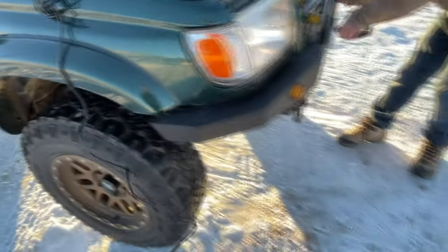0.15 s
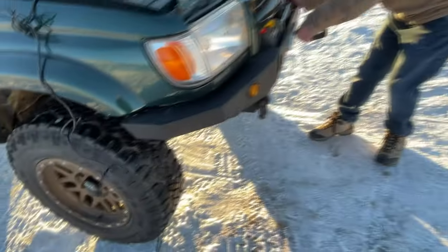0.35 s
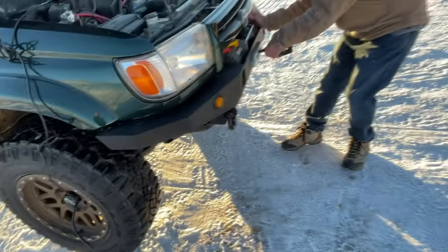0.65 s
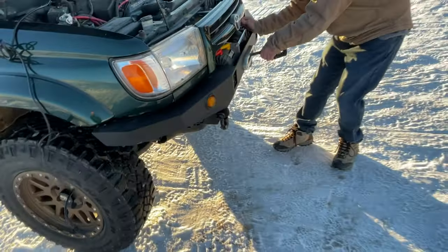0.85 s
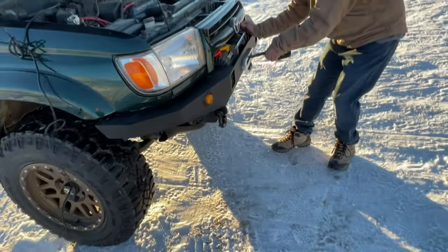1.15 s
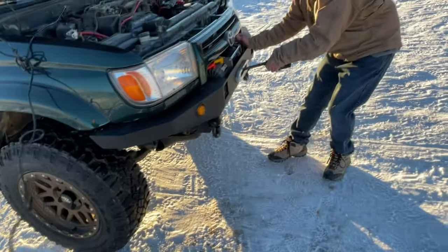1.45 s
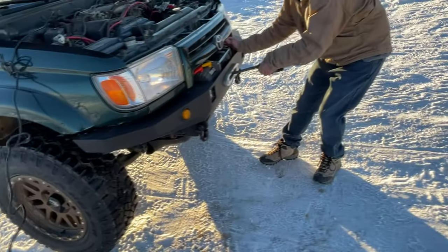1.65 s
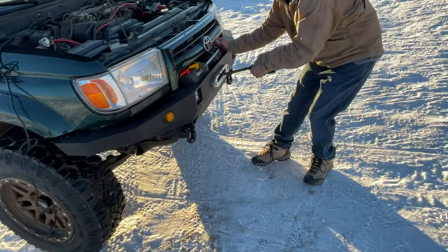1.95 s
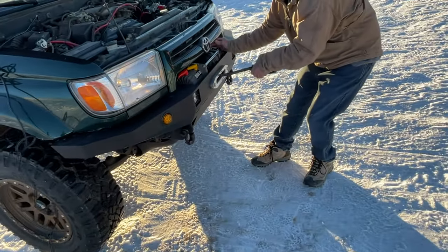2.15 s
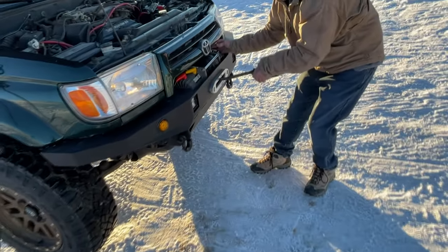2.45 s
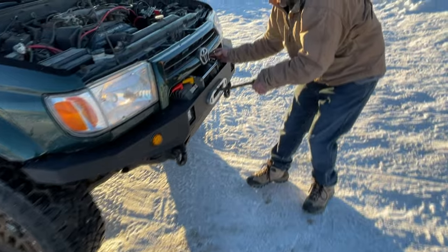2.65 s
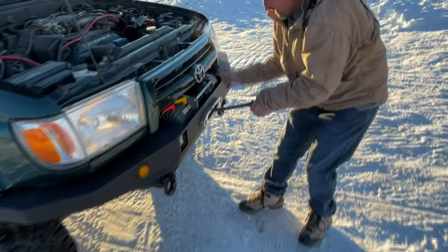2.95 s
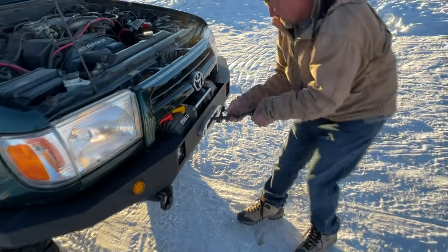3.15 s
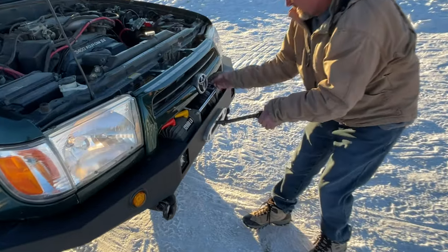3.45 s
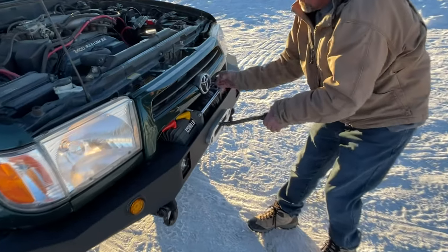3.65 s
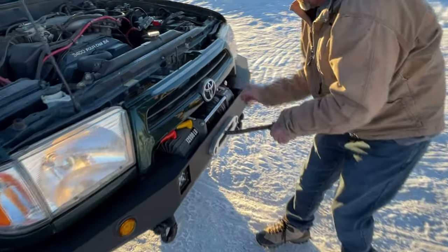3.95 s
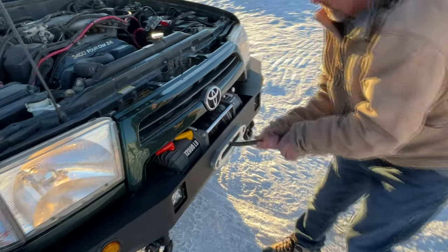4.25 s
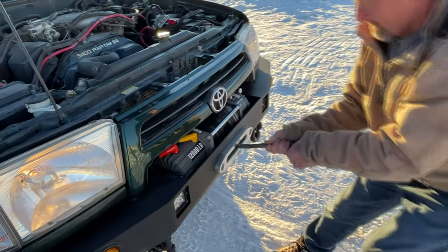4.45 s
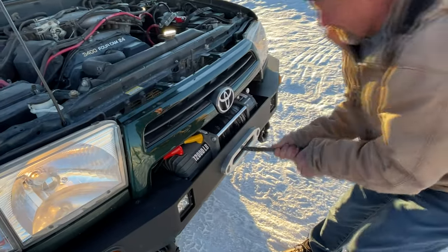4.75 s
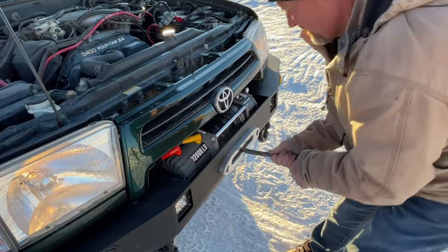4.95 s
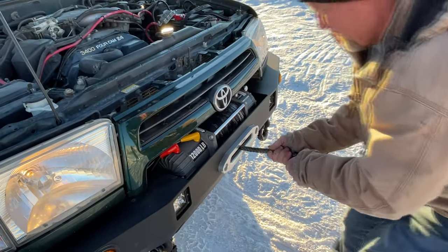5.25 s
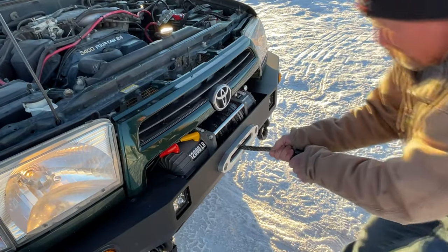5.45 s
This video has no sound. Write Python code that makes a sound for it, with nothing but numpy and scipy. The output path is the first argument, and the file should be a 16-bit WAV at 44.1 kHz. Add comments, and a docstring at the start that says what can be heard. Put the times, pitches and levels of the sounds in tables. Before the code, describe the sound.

Outdoors on snow beside an open engine bay, heard closely on a handheld phone in stereo. A plastic remote key snaps, a winch clunks hard and spins up with a rough, whining rattle, then is switched off and coasts down. The petrol engine idles underneath, and a few cable clinks, ticks, a metal clunk and short scrapes follow.

```python
"""Outdoors in snow, at the steel front bumper of a vehicle with its bonnet open.
A remote key snaps; an electric winch clunks, spins up, is switched off and coasts to rest: brushes
whine at multiples of the shaft rate, and rough gear knocks drive resonances of housing and bumper.
The petrol engine, crank orders plus shaped noise, idles and sags under the load; grit bursts make
hook and cable clink, scrape and tick. All is heard through the two ports of a handheld phone."""
import sys
import numpy as np
from scipy import signal
from scipy.fft import rfft, irfft
from scipy.io import wavfile
from scipy.ndimage import uniform_filter1d

SR = 44100
rng = np.random.default_rng(int(sys.argv[2]) if len(sys.argv) > 2 else 0)


def master(y):
    """Save y as 16-bit WAV."""
    cut = np.clip(np.atleast_2d(y).T, -1, 1)
    pcm = np.round(cut * 32767)  # scale
    wavfile.write(sys.argv[1], SR, pcm.astype(np.int16))


N = 246519
T = np.arange(N) / SR
F = np.maximum(np.arange(N // 2 + 1) * SR / N, 1.)

# resonances of the winch housing: f/Hz, width/Hz, level/dB
BOOM_MODES = [(295.5, 12.9, 0.5), (339.4, 21.7, 1), (367.4, 19.2, 1), (416, 21.6, -1), (450, 24.6, -4),
              (500.5, 17.6, -5), (612, 36, -9.5)]
# resonances of the steel bumper: f/Hz, width/Hz, level/dB
STEEL_MODES = [(608, 45, -8), (828, 55, -1), (1015, 50, -3), (1215, 40, -3), (1361, 26, -6), (1560, 45, -2),
               (1745, 70, -1), (2325, 60, -15), (3760, 200, -20), (4880, 70, -10), (6460, 400, -10),
               (7700, 150, -16)]
# winch: switched on, gear teeth engage, switched off, brake holds
ON_S, SLACK_S, OFF_S, STOP_S = 0.227, 0.2693, 1.62, 2.5
FREE_TURNS_S = 92.5  # motor shaft at free speed, turns/s


def shaft():
    """Speed as a share of free speed: a run-up in a quick and a slow stage, then an even run-down."""
    quick_share, quick_s, slow_s = .45, .024, .25
    coast_turns_s2 = 79.5
    on = np.clip(T - ON_S, 0, None)
    off = np.clip(T - OFF_S, 0, None)
    up = 1 - quick_share * np.exp(-on / quick_s) - (1 - quick_share) * np.exp(-on / slow_s)
    return np.clip(up - coast_turns_s2 / FREE_TURNS_S * off, .01, 1)


def rotor():
    """Angle of the motor shaft, which never runs quite evenly."""
    turns_s = FREE_TURNS_S * shaft() * (1 + .0013 * walk(40))
    return 2 * np.pi * np.cumsum(turns_s) / SR


def motor(turn):
    """Brushes cross the commutator bars; an uneven rotor throbs the whine and shakes the mount once a turn."""
    # whine: multiple of bar rate, level/dB, depth of the throb
    whine_orders = [(1, -2, .6), (2, -1.5, .55), (3, -13, .9)]
    bars = 29
    speed, off = shaft(), np.clip(T - OFF_S, 0, None)
    # share of stall current, capped; the tones grow with it
    current = np.minimum(1 - speed, .17) * (T < OFF_S)
    whine_db = -50 + 55 * current
    overtone_db = -46.5 + 22 * current
    # the motor case lifts the whine as it sweeps through
    case_hz, case_width_hz, case_db = 1950, 300, 5
    offset = (bars * FREE_TURNS_S * speed - case_hz) / case_width_hz
    whine_db = whine_db + case_db * np.exp(-.5 * offset ** 2)

    throb = np.cos(turn) + np.cos(2 * turn + 1.4) + .37 * np.cos(3 * turn + 3.8) + .5 * np.cos(4 * turn + .42)
    first, *overtones = (
        undb(db + 3 * walk(60)) * (1 + depth * throb) * np.sin(k * bars * turn)
        for k, db, depth in whine_orders)
    whine = undb(whine_db) * first + undb(overtone_db) * sum(overtones)
    # fades in as the teeth engage, and away once the current is cut
    engaged = np.clip((T - SLACK_S) / .05, 0, 1) * undb(-130 * off)

    # under power the hum follows speed; after switch-off it only fades
    hum_growth = speed ** (5.5 * (T < OFF_S))
    hum = hum_growth * undb(-36 - 91.5 * off + 1.9 * walk(11.04)) * np.sin(turn)
    return engaged * whine + np.sqrt(2) * hum


def gears(turn):
    """Loose teeth knock unevenly; the housing booms, the steel bumper rings and the brushes hiss."""
    # colour of the rattle: f/Hz, level/dB per Hz
    rattle_colour = [(450, -43), (620, -9), (800, 4), (1300, 5.5), (1800, -2), (2500, -14), (3300, -43),
                     (6000, -43)]
    # colour of the brush hiss: f/Hz, level/dB per Hz
    brush_colour = [(1800, 4), (2800, 3.5), (3800, 0.5), (5000, -1), (5700, -19), (6500, -18), (8300, 4),
                    (10000, -3), (13800, -29), (15500, -78)]
    speed = shaft()
    running = np.clip((T - SLACK_S) / .0049, 0, 1) * np.clip((STOP_S - T) / .077 + 1, 0, 1)
    # a burst as the teeth take up their slack
    slack_db = 27 * np.exp(-np.clip(T - SLACK_S, 0, None) / .015)
    tooth_knocks = grit(2.3) * undb(1.7 * walk(80))
    mesh = grit(2.2) * undb(2 * walk(100) + walk(13.97))

    wobble = unit(sum(np.cos(k * turn) for k in range(3, 8)))
    boom_drive = (tooth_knocks + .08 * wobble) * undb(walk(45) + slack_db * (T > SLACK_S))
    # the housing booms most on the way up
    surge_db = 7.5 * bell(.51, .0973)
    boom = ring(boom_drive, BOOM_MODES) * speed ** 1.36 * undb(-27.5 + surge_db)

    # one high tooth strikes once a turn, so the bumper sings where a shaft multiple meets a mode
    tooth = unit(sum(np.cos(k * turn) for k in range(6, 28)))
    bumper = flutter(grit(1.5) + .3 * tooth, STEEL_MODES[:8], 3.5, 14)
    rattle = unit(colour(mesh, rattle_colour) + bumper)
    # above 2250 Hz the rattle dies faster as the gears slow
    dull = signal.sosfiltfilt(signal.butter(4, 2250, fs=SR, output="sos"), rattle)
    bright = (rattle - dull) * speed ** (2.4 * (T > OFF_S))
    rattle = (dull + bright) * speed ** 1.53 * undb(-28.5 + slack_db)

    hiss = unit(colour(mesh, brush_colour) + undb(-5) * ring(grit(1.35), STEEL_MODES[8:]))
    brushes = undb(-32) * speed ** np.where(T < OFF_S, 1, 3.77)
    brake = undb(-46.5) * bell(2.396, .073)  # rubs before the stop
    return running * (boom + rattle + hiss * (brushes + brake))


def jolt():
    """The start jolt leaves the lowest housing mode ringing after the teeth engage."""
    after = np.clip(T - .274, 0, None)
    t60_s = .55
    return undb(-20.5 - 60 * after / t60_s) * np.sin(2 * np.pi * BOOM_MODES[0][0] * after)


def drones():
    """Single modes that stand out for a while: one of the bumper, one of the housing."""
    def tone(hz, db):
        wavering_hz = hz * (1 + .0045 * walk(20))
        level = np.sqrt(2) * undb(db + 3.1 * walk(25.3))
        return level * np.sin(2 * np.pi * np.cumsum(wavering_hz) / SR)

    # the bumper sings while the shaft nears full speed
    sing = (T > SLACK_S) * bell(.78, .24) * tone(STEEL_MODES[4][0], -36.5)
    # the last slow turns drone in the lowest housing mode
    stopping = np.clip((STOP_S - T) / .05 + 1, 0, 1)
    drag = stopping * bell(2.33, .18) * tone(BOOM_MODES[0][0], -39.5)
    return sing + drag


def knocks():
    """All contacts of relay, gears, hook, cable and housing: grit bursts that ring housing, hardware or both."""
    # resonances of the hook: f/Hz, width/Hz, level/dB
    hook_modes = [(990, 95, 9), (1470, 31, 16), (1600, 89, 6), (1836, 29, 9), (2220, 70, 0),
                  (3130, 100, -5), (4020, 77, -3), (4190, 110, 0), (4740, 140, -9), (5600, 350, 2),
                  (6270, 300, -1), (7500, 100, 4)]
    # contact kinds: rise/ms, spread/octaves, housing boom/dB, steel ring/dB (None = not rung), opening tick size
    clunk_kind = (3.5, 1.44, -5, -3.5, 8)
    scrape_kind = (5, 1.3, -18.5, -0.5, 0)
    thud_kind = (2, 0.66, -11, None, 3)
    clink_kind = (0.96, 0.84, None, -14, 3)
    tick_kind = (0.03, 0.33, None, -6, 7)
    # relay, gear and hook blows that reach the housing: t/s, level/dB, centre f/Hz, hold/ms, t60/ms
    clunk_rows = [(0.225, -29, 2890, 38, 40), (0.238, -22, 1500, 13, 34), (0.25, -16, 1580, 5.6, 110),
                  (3.815, -23, 1040, 6, 124)]
    # slow contacts of hook and cable: t/s, level/dB, centre f/Hz, hold/ms, t60/ms
    scrape_rows = [(5.294, -21.5, 2800, 7.6, 45), (5.308, -21.5, 2300, 7, 57), (5.334, -37, 3000, 21, 200),
                   (5.367, -36, 1090, 26, 110)]
    # dull low thuds that boom in the winch housing: t/s, level/dB, centre f/Hz, hold/ms, t60/ms
    thud_rows = [(2.408, -36.5, 700, 4, 45), (3.744, -37, 533, 13, 75), (3.823, -27, 440, 9, 220),
                 (3.873, -31, 259, 5.5, 39)]
    # bright cable clinks: t/s, level/dB, centre f/Hz, hold/ms
    clink_rows = [(0.862, -26, 4950, 5.6), (1.596, -28, 3600, 12), (2.355, -49, 4300, 22),
                  (2.433, -39, 4260, 10), (2.588, -43.5, 4400, 12), (3.051, -36, 3860, 1.5),
                  (3.788, -39, 2720, 18)]
    # small dry ticks: t/s, level/dB, centre f/Hz
    tick_rows = [(2.876, -39, 1280), (2.911, -41, 900), (2.981, -41, 900), (3.054, -28.5, 1770),
                 (3.923, -39, 900), (4.311, -26.5, 1350)]
    bodies = poles(BOOM_MODES[3:]), poles(hook_modes)
    clunks = sum(contact(bodies, clunk_kind, *row) for row in clunk_rows)
    scrapes = sum(contact(bodies, scrape_kind, *row) for row in scrape_rows)
    thuds = sum(contact(bodies, thud_kind, *row) for row in thud_rows)
    clinks = sum(contact(bodies, clink_kind, *row, t60_ms=45) for row in clink_rows)
    ticks = sum(contact(bodies, tick_kind, *row, hold_ms=1.3, t60_ms=41) for row in tick_rows)
    return clunks + scrapes + thuds + clinks + ticks


def contact(bodies, kind, s, db, hz, hold_ms, t60_ms):
    """A burst of grit in a broad band; part of the blow rings the housing, the steel hardware or both."""
    rise_ms, spread, boom_db, steel_db, tick = kind
    ms = (T - s) * 1000
    decay_ms = np.clip(ms - rise_ms - hold_ms, 0, None)
    shape = np.clip(ms / rise_ms, 0, 1) * undb(-60 * decay_ms / t60_ms)
    blow = grit(2.6)
    blow[int((s + rise_ms / 1000) * SR)] = tick
    band = through(blow, np.exp(-.5 * (np.log2(F / hz) / spread) ** 2)) * shape
    size = np.sqrt(np.mean(band ** 2))
    boom = 0 if boom_db is None else undb(boom_db) * through(blow * shape, bodies[0])
    steel = 0 if steel_db is None else undb(steel_db) * through(band, bodies[1])
    return undb(db) * (band + size * (boom + steel))


def button():
    """The remote's plastic key snaps close to the phone and its shell pings."""
    # shell pings: f/Hz, level/dB
    shell_pings = [(3500, -5), (6460, -14), (8000, -14), (10500, -16.5)]
    ping = sum(undb(db) * np.sin(2 * np.pi * (hz * T + rng.random())) for hz, db in shell_pings)
    snap = undb(-8.5) * ring(grit(.81), [(6000, 10000, 0)])
    return undb(-12.5) * (ping + snap) * bell(.2022, .0014)


def engine():
    """Uneven cylinders sound many crank orders, strongest at 4, 7 and 13; roar pulses, valves tick twice a turn."""
    # engine levels over time: the low throb enters at half a second, roar and hiss vary:
    # t/s, exhaust throb level/dB, block roar level/dB, fan hiss level/dB
    bay_levels = [(0, -80, -40.5, -50), (0.42, -70, -35, -56), (0.55, -46.5, -31.5, -49.5),
                  (1.6, -39.5, -42.5, -54), (2.2, -41.5, -39, -54.5), (3.1, -44.5, -36.5, -51.5),
                  (3.9, -43, -35.5, -51.5), (4.7, -46.5, -34.5, -48.5), (5.15, -48, -34.5, -50.5),
                  (5.2, -48.5, -36.5, -53), (5.59, -50, -38, -54)]
    # exhaust throb: multiple of crank rate, level/dB
    crank_orders = [(3, -17), (4, 0), (5, -5), (6, -5), (7, 0), (8, -10), (10, -14), (11, -12), (12, -10),
                    (13, -4), (14, -10), (16, -10)]
    # colour of the block roar: f/Hz, level/dB per Hz
    roar_colour = [(22, -36), (35, -22.5), (54, -13), (120, -2.5), (155, -11), (250, -5), (380, -11.5),
                   (600, -12.5), (1000, -11.5), (1350, -12), (1800, -19), (2800, -24.5), (5200, -31),
                   (9000, -40.5), (12000, -88)]
    # colour of the fan hiss: f/Hz, level/dB per Hz
    fan_colour = [(3000, -2), (5000, -7), (8000, -1.5), (9500, -3.5), (11000, -2), (12500, -3.5),
                  (14000, -6.5), (15500, -12)]
    throb_db, roar_db, fan_db = curves(bay_levels)

    # the winch's draw on the alternator pulls the idle down, with a lag
    idle_turns_s, sag_turns_s, lag_s = 17.75, 1.6, .3
    lag = int(lag_s * SR)
    powered = 1. * (T > ON_S) * (T < OFF_S)
    load = uniform_filter1d(powered, lag, origin=(lag - 1) // 2)  # mean of the past only
    crank = idle_turns_s - sag_turns_s * load
    turn = 2 * np.pi * np.cumsum(crank * (1 + .01204 * walk(5))) / SR

    throb = sum(
        undb(db + 1.35 * walk(9)) * np.sin(k * turn + 2 * np.pi * rng.random())
        for k, db in crank_orders)
    # the roar pulses with the firings, three a turn
    roar = colour(grit(1.96) * undb(1.5 * np.cos(3 * turn) + 1.42 * walk(12)), roar_colour)
    valve_ticks = 1 + .85 * np.exp(-(turn / np.pi % 1) / .23)
    fan = colour(grit(1.66) * valve_ticks, fan_colour)

    # the treble hiss swells once, then roar and hiss dip briefly
    swell_s = 4.93
    fan_db = fan_db + 7.5 * bell(swell_s, np.where(T < swell_s, .065, .015))
    dip = undb(-27.5 * bell(5.167, .00515))
    bay = (undb(roar_db) * roar + undb(fan_db) * fan) * dip
    return np.sqrt(2) * undb(throb_db) * throb + bay


def covers():
    """Engine covers ring faintly at their own pitches."""
    # cover resonances: f/Hz, width/Hz, level/dB
    cover_modes = [(232, 9, 7), (385, 14, -1), (570, 14, 1), (893, 12, 1), (1190, 7, 2), (1463, 14, -6),
                   (1604, 9, -1), (5200, 120, -22)]
    # the ringing rises, then eases a little near the end: t/s, level/dB
    cover_levels = [(0, -64), (2.6, -55), (3.6, -53), (4.5, -47), (5.15, -47), (5.2, -50), (5.59, -50)]
    return undb(curves(cover_levels)[0]) * flutter(grit(1.4), cover_modes, .77, 3.95)


def ports(x, scatter_ms):
    """The right port hears the sound late; both hear scattered bounces off snow and bodywork, in opposite sense."""
    # phase by which the left port leads: f/Hz, lead/rad
    port_lead = [(0, 0), (400, .45), (650, 1.2), (1380, 2.2), (1810, 4.8), (2500, 9), (2840, 9.6),
                 (4220, 14), (5940, 10.4), (6900, 12), (7500, 9.9), (8200, 9.9), (9000, 9.42), (10300, 8.6),
                 (11700, 7.45), (13000, 6.35), (13700, 6.28), (16500, 6.28)]
    # left minus right: f/Hz, level/dB
    port_tilt = [(60, 1), (380, .5), (650, 6), (1250, .5), (2400, 3), (5000, 6.5), (7500, 4), (8600, 0),
                 (15000, 0)]
    # likeness of the two ports: f/Hz, likeness/0-1
    port_likeness = [(60, .94), (150, .9), (350, .95), (700, .7), (1200, .55), (2000, .3), (5000, .25),
                     (7500, .55), (9000, .85), (11500, .72), (13200, .97)]
    bounce = rfft(rng.standard_normal(N) * np.exp(-T * 1000 / scatter_ms))
    bounce = bounce / np.sqrt(np.mean(np.abs(bounce) ** 2))
    alike = np.clip(across(port_likeness), 0, 1)
    direct = np.sqrt((1 + alike) / 2)
    stray = np.sqrt((1 - alike) / 2) * bounce
    tilt = undb(across(port_tilt) / 2)
    late = np.exp(-1j * np.interp(F, *np.transpose(port_lead)))
    left = (direct + stray) * tilt
    right = (direct - stray) * late / tilt
    return irfft(rfft(x) * np.array([left, right]), N)


def undb(db):
    """Amplitude factor of a level in dB."""
    return 10 ** (np.asarray(db) / 20)


def unit(x):
    """Scaled to an rms of one."""
    return x / np.sqrt(np.mean(x ** 2))


def bell(s, width_s):
    """A Gaussian swell in time, one at its peak."""
    return np.exp(-.5 * ((T - s) / width_s) ** 2)


def curves(rows):
    """Columns of a time table, one value per sample."""
    s, *columns = np.transpose(rows)
    return [np.interp(T, s, c) for c in columns]


def across(points):
    """A table of frequency and value read at every frequency, along log frequency."""
    hz, value = np.transpose(points)
    return np.interp(np.log(F), np.log(np.maximum(hz, 1.)), value)


def walk(rate):
    """Random levels held 1 / rate s and slewed twice."""
    k = int(SR / rate)
    held = np.repeat(rng.standard_normal(N // k + 1), k)
    return 1.426 * uniform_filter1d(uniform_filter1d(held, k), k)[:N]


def grit(scatter_db):
    """Dense clicks of very unequal size."""
    return unit(rng.standard_normal(N) * undb(scatter_db * rng.exponential(size=N)))


def through(x, response):
    """Sound filtered by a frequency response, at unit rms."""
    return unit(irfft(rfft(x) * response, N))


def colour(x, points):
    """Sound shaped by a spectrum table, at unit rms."""
    return through(x, undb(across(points)))


def poles(modes):
    """Response of causal resonators with alternating sign."""
    return sum(
        (-1) ** k * undb(db) / (1 + 1j * (F - hz * hz / F) / width)
        for k, (hz, width, db) in enumerate(modes))


def ring(x, modes):
    """Sound that drives a set of resonators, at unit rms."""
    return through(x, poles(modes))


def flutter(x, modes, depth_db, rate):
    """Resonators whose strengths come and go one by one."""
    return unit(sum(
        undb(db + depth_db * walk(rate)) * signal.lfilter(*signal.iirpeak(hz, hz / width, SR), x)
        for hz, width, db in modes))


def scene():
    """Clear tones reach both ports together; all else is spread between the ports."""
    turn = rotor()
    pan = undb(2 * np.array([[.5], [-.5]]))  # left 2 dB above right
    tones = (motor(turn) + drones() + covers()) * pan
    machines = ports(gears(turn) + engine(), scatter_ms=60)
    blows = ports(jolt() + knocks(), scatter_ms=5)
    key = ports(button(), scatter_ms=.4)
    return tones + machines + blows + key


def record(dry):
    """The phone rounds the loudest peaks and cuts the top above 15.9 kHz."""
    rounded = .75 * np.tanh(dry / .75)
    return signal.sosfilt(signal.ellip(10, .2, 80, 15900, fs=SR, output="sos"), rounded)


dry = scene()
out = record(dry)
master(out)
```